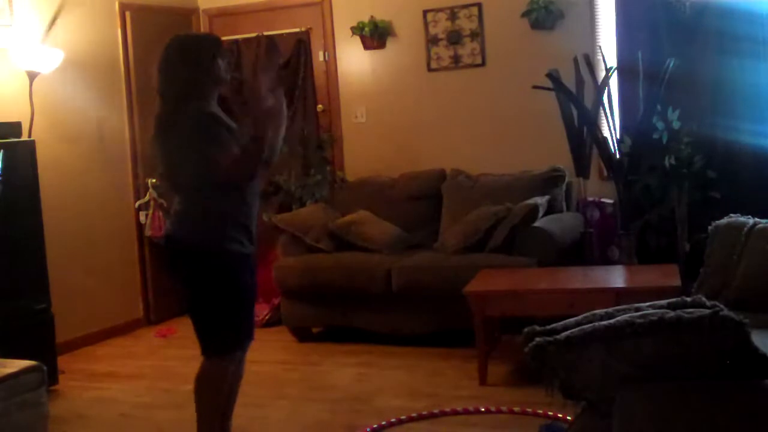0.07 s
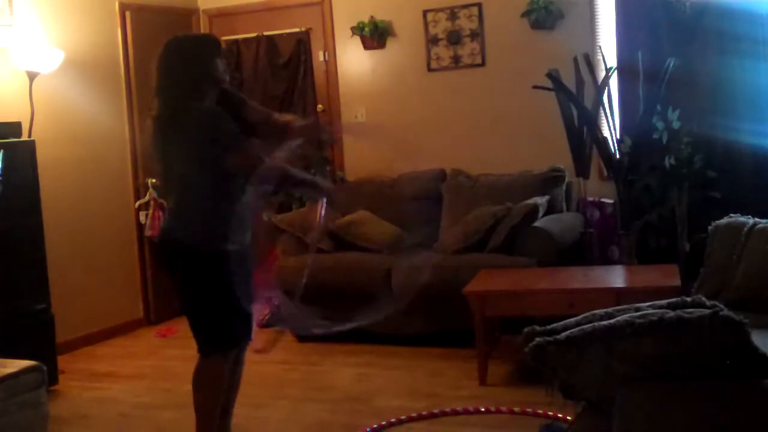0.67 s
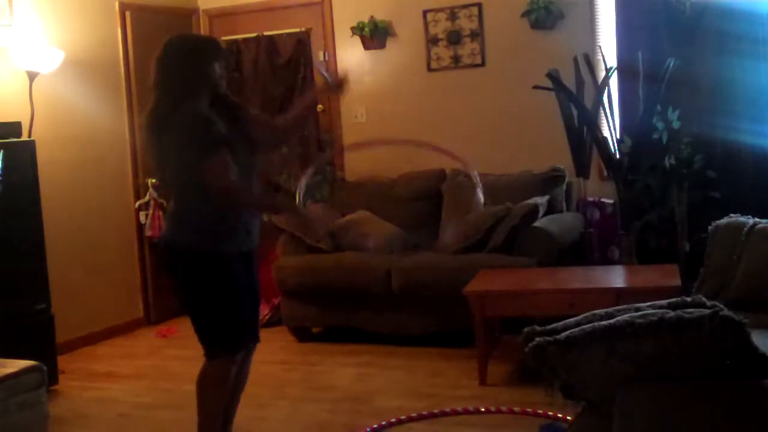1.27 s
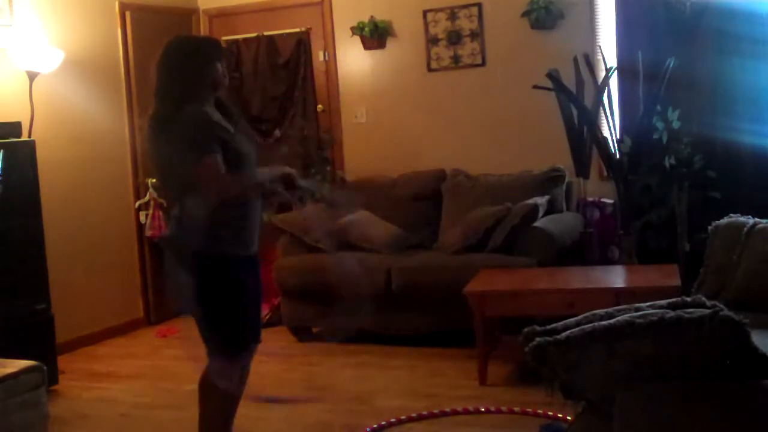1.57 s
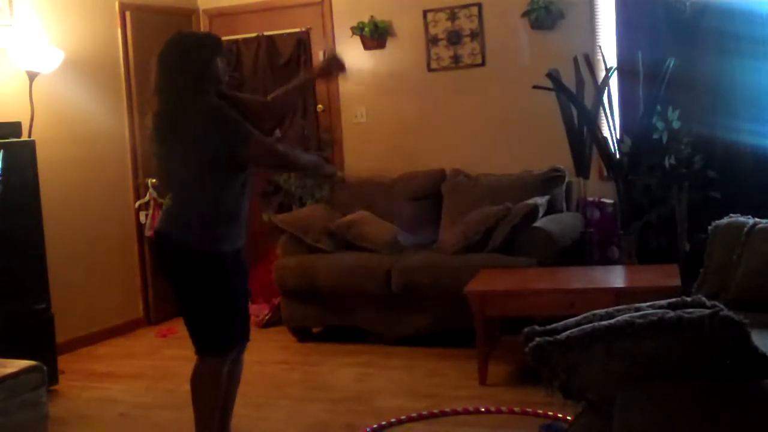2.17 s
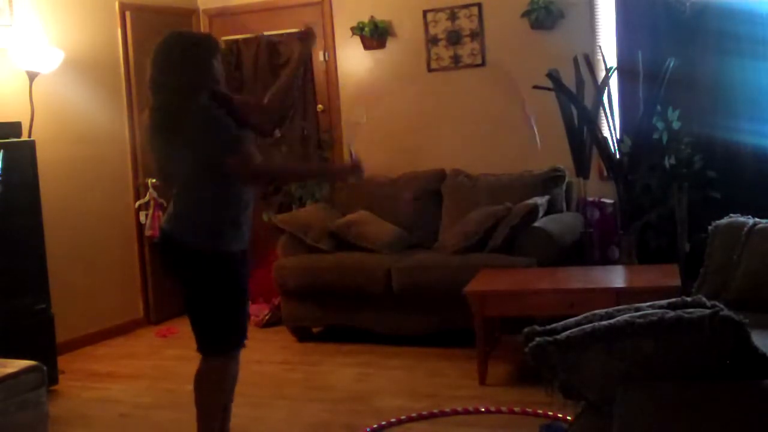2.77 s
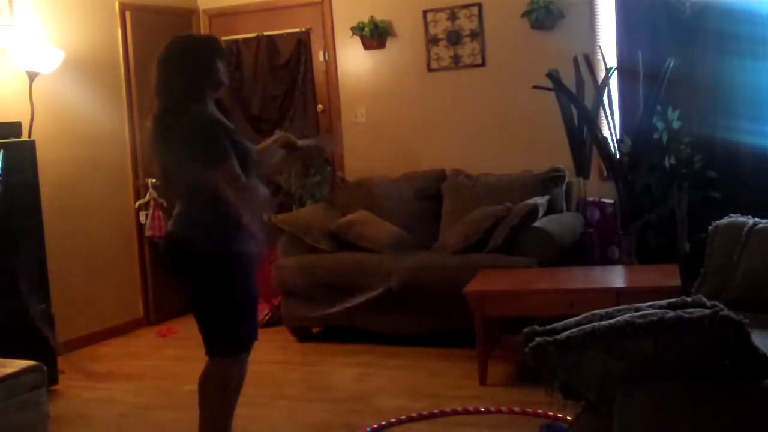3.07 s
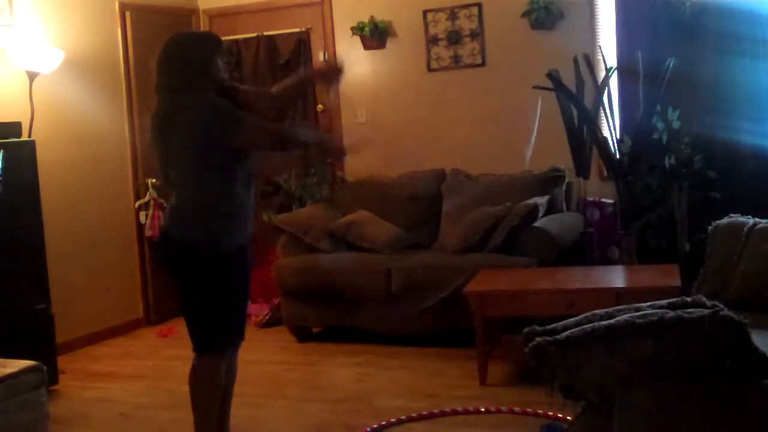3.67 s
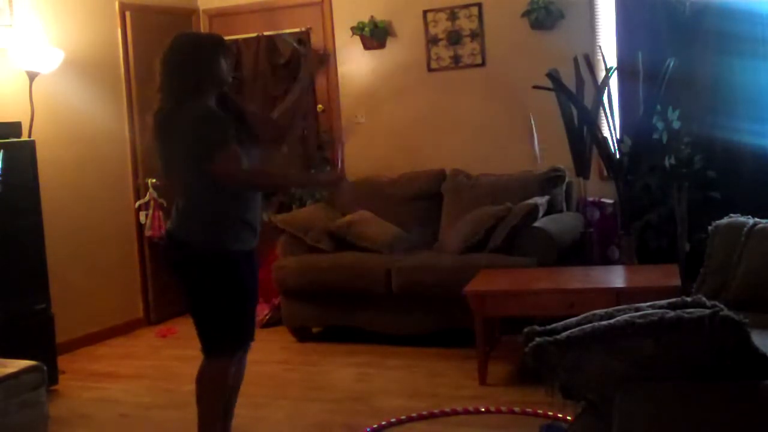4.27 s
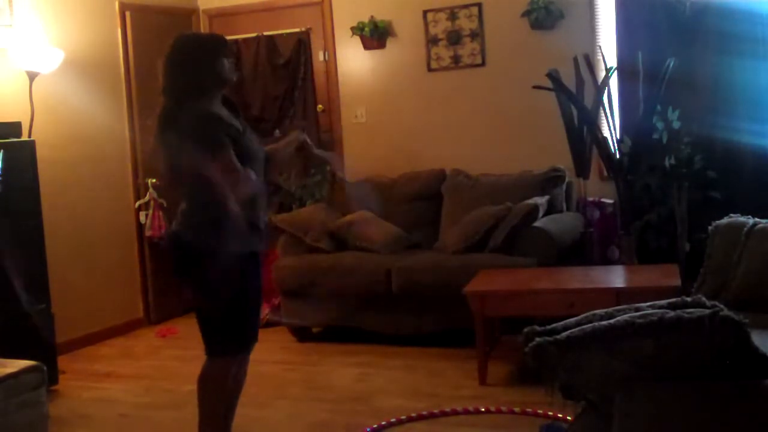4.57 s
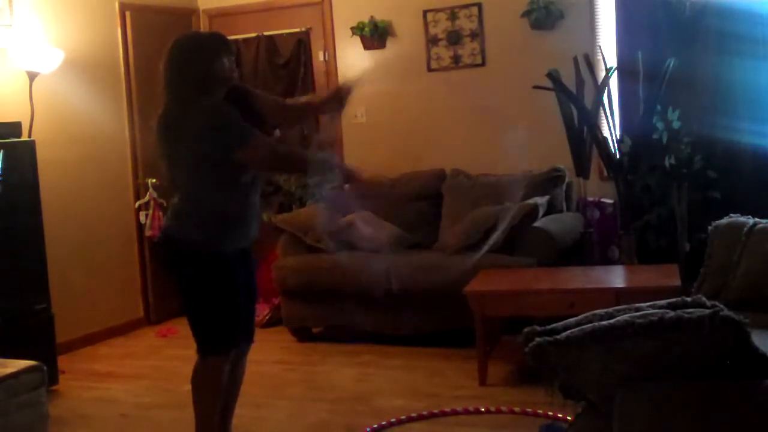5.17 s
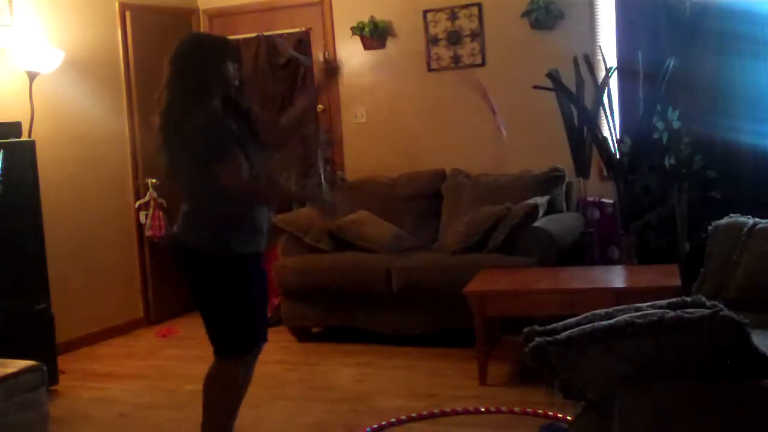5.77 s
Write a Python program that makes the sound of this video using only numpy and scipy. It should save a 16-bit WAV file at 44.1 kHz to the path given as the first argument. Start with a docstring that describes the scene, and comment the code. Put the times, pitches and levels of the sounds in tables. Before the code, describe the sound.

A burst of hard plastic knocks opens the scene as twirling hoops hit each other, the loudest with a slight low thud underneath. After that come only scattered light scrapes and barely audible slides through the palms, until one more bright clack and some softer touches late on. The hoops are heard from a few metres away in a living room, over low hiss and a faint, rising rumble like far traffic.

```python
"""Twirling plastic hoops

Two hoops are twirled by hand in a quiet living room, a few metres away. Now and then they collide:
the tube wall cracks, the hollow tube knocks, and the room rings on. Between the clacks they graze,
slide through the palms and rub faintly. Under the room hiss a far rumble, like traffic, slowly grows."""
import sys
import numpy as np
from scipy import signal
from scipy.fft import rfft, irfft
from scipy.io import wavfile

SR = 44100
rng = np.random.default_rng(int(sys.argv[2]) if len(sys.argv) > 2 else 0)


def master(y):
    """Save y as 16-bit WAV."""
    cut = np.clip(np.atleast_2d(y).T, -1, 1)
    pcm = np.round(cut * 32767)  # scale
    wavfile.write(sys.argv[1], SR, pcm.astype(np.int16))


N = 261072


def from_db(db):
    """Decibels to gain."""
    return 10 ** (np.asarray(db) / 20)


def at_hz(points, hz):
    """Read a curve on a log-frequency axis."""
    points_hz, values = np.transpose(points)
    return np.interp(np.log(np.maximum(hz, 1)), np.log(points_hz), values)


def unit_energy(sound):
    """Scale a short sound to an energy of 1."""
    return sound / np.linalg.norm(sound)


def add(track, start_s, sound):
    """Mix a sound into a track at a time."""
    start = max(round(start_s * SR), 0)
    part = track[..., start:start + sound.shape[-1]]
    part += sound[..., :part.shape[-1]]


def noise(spectrum, size):
    """Noise of the given colour, rms 1."""
    hz = np.arange(size // 2 + 1) * SR / size
    phases = np.exp(2j * np.pi * rng.random(len(hz)))
    coloured = irfft(from_db(at_hz(spectrum, hz)) * phases, size)
    return coloured / coloured.std()


def stereo_noise(spectrum, likeness, size):
    """Diffuse noise: centred where left and right are alike, wide where they are unrelated."""
    hz = np.arange(size // 2 + 1) * SR / size
    alike = np.clip(at_hz(likeness, hz), -.99, .99)
    mid = irfft(rfft(noise(spectrum, size)) * np.sqrt((1 + alike) / 2), size)
    side = irfft(rfft(noise(spectrum, size)) * np.sqrt((1 - alike) / 2), size)
    return np.array([mid + side, mid - side])


def struck(modes):
    """One blow on a set of decaying modes; neighbouring modes swing in opposite senses."""
    t = np.arange(SR // 2) / SR
    hz, level_db, t60_s = np.transpose(sorted(modes))[:, :, None]
    polarity = (-1) ** np.arange(len(modes))[:, None]
    decay = np.exp(-np.log(1000) * t / t60_s)
    return np.sum(polarity * from_db(level_db) * decay * np.sin(2 * np.pi * hz * t), axis=0)


# colours of the hiss and the rumble: freq_hz, level_db
HISS_SPECTRUM = [(20, -99), (50, -99), (80, -96.5), (150, -99.5), (240, -98), (500, -100.5), (1100, -101.5),
                 (2400, -105.5), (4800, -108), (7000, -113.5), (10000, -120.5), (12000, -123.5),
                 (12800, -146), (14000, -165)]
RUMBLE_SPECTRUM = [(20, 11), (45, 1), (85, 5.5), (140, -0.5), (270, -8.5), (500, -4.5), (1000, -7.5),
                   (1600, -12), (2200, -7.5), (3200, -16.5), (6000, -29), (11000, -48), (13000, -80)]
# stereo image of the hiss, and of the rumble and room tail: freq_hz, likeness (0 wide, 1 mono)
HISS_LIKENESS = [(60, 0.4), (200, 0.19), (700, 0.28), (2400, 0.17), (5000, 0.03), (12000, 0.03)]
ROOM_LIKENESS = [(60, 1), (130, 0.93), (350, 0.97), (700, 0.96), (1300, 0.78), (2400, 0.33), (4400, 0),
                 (9000, 0)]
def background(pan_db):
    """The bed: steady hiss, and a far rumble that holds, then draws nearer."""
    nears_at_s, rise_db_per_s = 2.95, 5.5
    rumble_db = -74 + rise_db_per_s * np.maximum(np.arange(N) / SR - nears_at_s, 0)
    rumble = from_db(rumble_db) * stereo_noise(RUMBLE_SPECTRUM, ROOM_LIKENESS, N)
    hiss = from_db(-66) * stereo_noise(HISS_SPECTRUM, HISS_LIKENESS, N)
    return (hiss + rumble) * from_db([[pan_db / 2], [-pan_db / 2]])


def chatter(decay_s, size):
    """Bending waves run round the hoop at different speeds and smear a contact over milliseconds."""
    envelope = np.exp(-np.arange(size) / max(decay_s * SR, 1))
    burst = rfft(rng.standard_normal(size) * envelope)
    flat_burst = irfft(burst / np.abs(burst), size)
    return unit_energy(flat_burst * np.sqrt(envelope))


# what the furnishings send back: freq_hz, level_db
ROOM_COLOUR = [(100, 6.5), (800, 0), (2000, 2.5), (5000, 0.5), (10000, -1.5), (16000, 1)]
# length of the room tail: band_hz, t60_s
ROOM_DECAY = [(60, 0.16), (400, 0.48), (1000, 0.54), (2500, 0.43), (5000, 0.44), (8000, 0.45),
              (14000, 0.31)]
# early reflections off floor and walls: delay_s, level_db
REFLECTIONS = [(.0032, -13.5), (0.012, -17), (0.0291, -13)]
def in_room(sound, chatter_s=0):
    """One position of the hoop: the direct rattle, its reflections, and a tail dying band by band."""
    size, tail_db, build_s, direct_pan_db = 2 ** 15, 2.5, 0.0017, -2
    t = np.arange(size) / SR
    hz = np.arange(size // 2 + 1) * SR / size
    diffuse = rfft(stereo_noise(ROOM_COLOUR, ROOM_LIKENESS, size))
    bands_hz, t60s = np.transpose(ROOM_DECAY)
    response = np.zeros((2, size))
    for share, t60_s in zip(np.eye(len(bands_hz)), t60s):
        band_gain = at_hz(list(zip(bands_hz, share)), hz)
        response += irfft(diffuse * band_gain, size) * np.exp(-np.log(1000) * t / t60_s)
    response *= 1 - np.exp(-t / (build_s + chatter_s))
    response *= from_db(tail_db) / np.linalg.norm(response[0])
    direct = chatter(chatter_s, size)
    for channel, side in enumerate((1, -1)):
        add(response[channel], channel / SR, from_db(side * direct_pan_db / 2) * direct)
        for delay_s, level_db in REFLECTIONS:
            skew_s = rng.integers(0, 8) / SR  # a reflection from the side reaches one channel first
            add(response[channel], delay_s + skew_s, from_db(level_db) * direct)
    return signal.fftconvolve(sound[None], response, axes=1)


# hoop sliding through a palm; faint hollow rubs and a tiny squeak: middle_s, half_length_s, level_db
PALM_SLIDES = [(1.58, 0.053, -73), (1.78, 0.12, -73), (3.785, 0.023, -68.5), (3.98, 0.034, -65),
               (5.40, 0.012, -66)]
HOLLOW_RUBS = [(0.33, 0.021, -67.5), (3.256, 0.024, -67.5), (3.913, 0.002, -59.5), (3.98, 0.013, -65)]
# the bright slide and the hollow rub: freq_hz, level_db
SLIDE_SPECTRUM = [(200, -9), (700, -26), (2000, -2), (4000, 2.5), (6500, -3), (10000, -4.5), (12200, -10),
                  (13500, -43)]
RUB_SPECTRUM = [(200, -30), (550, -3.5), (780, -14), (950, 2.5), (1200, -20), (1550, -3.5), (2100, -18),
                (6000, -48.5)]
def strokes(cues, spectrum):
    """Friction noise that swells and fades with the speed of each stroke."""
    t = np.arange(N) / SR
    speed = sum(from_db(level_db) * np.exp(-((t - middle_s) / half_length_s) ** 2)
                for middle_s, half_length_s, level_db in cues)
    return speed * noise(spectrum, N)


# tones of the low boom: pitch_hz, level_db, t60_s
THUD_MODES = [(40.5, -4, 0.69), (73, -3, .25), (179.5, -4, 0.23), (256, -2.5, .15)]
# where the boom sounds: start_s, level_db
THUDS = [(0.717, -51.5), (0.742, -48), (5.174, -78)]
def thuds():
    """A low boom under some clacks: a few deep tones that start together and die away."""
    out = np.zeros(N)
    for start_s, level_db in THUDS:
        add(out, start_s, from_db(level_db) * struck(THUD_MODES))
    return out


# base colour of the wall's crack: freq_hz, level_db
CRACK_SPECTRUM = [(100, 1), (300, -7.5), (1000, -4), (1900, -5), (3100, -6), (4500, -6), (6000, -5.5),
                  (7500, -6.5), (9000, -9), (11500, -12), (14500, -26.5)]
def crack(centre_hz, low_cut_hz, tilt_db_per_octave):
    """The heavily damped tube wall: the spot hit sets a broad peak, the tilt how bright the crack is."""
    size, peak_db, peak_width_octaves = 2048, 7, 0.31
    hz = np.maximum(np.arange(size // 2 + 1) * SR / size, 1)
    octaves = np.log2(hz / centre_hz)
    colour_db = at_hz(CRACK_SPECTRUM, hz) + tilt_db_per_octave * np.maximum(octaves, -2)
    colour_db += peak_db * np.exp(-(octaves / peak_width_octaves) ** 2)
    # low cut: a glancing touch stirs only the short waves of the wall
    colour_db -= 10 * np.log10(1 + (low_cut_hz / np.maximum(hz, low_cut_hz / 4)) ** 6)
    # minimum phase: nothing sounds before the contact
    cepstrum = irfft(np.log(from_db(colour_db)), size)
    cepstrum[1:size // 2] *= 2
    spectrum = np.exp(rfft(cepstrum[:size // 2], size))
    return unit_energy(irfft(spectrum, size))


# hoop glances off hoop: start_s, level_db, scrape_s, centre_hz, low_cut_hz
GRAZES = [(0.676, -29, 0.02, 4520, 1500), (2.210, -31.5, 0.0097, 3300, 2820),
          (3.762, -39, 0.018, 6460, 2800), (3.950, -27.5, 0.038, 3650, 250), (5.356, -25, 0.02, 2320, 1570),
          (5.478, -35.5, 0.0037, 5600, 4000), (5.806, -46.5, 0.0055, 6000, 3000)]
def grazes():
    """Glancing touches stir only the wall; the longer the scrape, the duller it is."""
    neutral_scrape_s = 0.013
    out = np.zeros((2, N))
    for start_s, level_db, scrape_s, centre_hz, low_cut_hz in GRAZES:
        tilt_db_per_octave = -2 * np.log2(scrape_s / neutral_scrape_s)
        wall = crack(centre_hz, low_cut_hz, tilt_db_per_octave)
        add(out, start_s, from_db(level_db) * in_room(wall, scrape_s))
    return out


# overtones of the hollow tube: pitch_hz, level_db, t60_s
TUBE_MODES = [(769, 5.5, 0.022), (894, -0.5, 0.038), (1013, -3, 0.028), (1346, -9, 0.025)]
def knock(pitch_hz):
    """The hollow tube, struck once: a tight grip lowers its main mode and damps it."""
    main_mode_db, grip_damping_power = 0.5, 4.7
    t60_s = 0.05 * (pitch_hz / 397) ** grip_damping_power
    return unit_energy(struck([(pitch_hz, main_mode_db, t60_s), *TUBE_MODES]))


def contact(crack_db, wall, knock_db, knock_hz):
    """Crack and knock layered; the hoop keeps moving, so each contact excites the room anew."""
    sound = from_db(knock_db) * knock(knock_hz)
    add(sound, 0, from_db(crack_db) * wall)
    hard_hit_db, halving_db = -4.5, 9.5
    chatter_s = 0.0027 * 2 ** ((hard_hit_db - crack_db) / halving_db)  # a harder contact is over sooner
    return in_room(sound, chatter_s)


# hoop hits hoop and rebounds once: start_s, crack_db, centre_hz, tilt_db_per_octave, knock_db, knock_hz,
# rebound_delay_s, rebound_gain_db (over the first crack), rebound_low_cut_hz
CLACKS = [(0.5214, -23, 3500, -0.5, -19, 391, .0122, 2, 800),
          (0.7140, -16, 3950, 4, -17.5, 340, .005, -0.5, 200),
          (0.7364, -4, 4930, 0.5, -15, 493, .0050, 1, 3600),
          (0.8553, -12, 4760, 1.5, -13, 438, .003, 3, 400),
          (5.1753, -10.5, 7160, 1, -18, 406, .003, -0.5, 453)]
def clacks():
    """Each collision is a square hit, then a rebound that rings the wall and hardly knocks."""
    hit_low_cut_hz, rebound_centre_hz, rebound_knock_gain_db = 285, 5250, -9.5
    out = np.zeros((2, N))
    for (start_s, crack_db, centre_hz, tilt_db_per_octave, knock_db, knock_hz,
         rebound_delay_s, rebound_gain_db, rebound_low_cut_hz) in CLACKS:
        hit_wall = crack(centre_hz, hit_low_cut_hz, tilt_db_per_octave)
        rebound_wall = crack(rebound_centre_hz, rebound_low_cut_hz, tilt_db_per_octave)
        add(out, start_s, contact(crack_db, hit_wall, knock_db, knock_hz))
        rebound_knock_db = knock_db + rebound_knock_gain_db
        rebound = contact(crack_db + rebound_gain_db, rebound_wall, rebound_knock_db, knock_hz)
        add(out, start_s + rebound_delay_s, rebound)
    return out


def scene():
    """The hoops in the room, over the bed; the long waves of the thuds reach left and right alike."""
    handling = strokes(PALM_SLIDES, SLIDE_SPECTRUM) + strokes(HOLLOW_RUBS, RUB_SPECTRUM)
    return clacks() + grazes() + thuds() + in_room(handling)[:, :N] + background(pan_db=-1.3)


def record(dry):
    """A steep high cut on the whole mix."""
    cutoff_hz = 14200
    return signal.sosfilt(signal.ellip(10, .1, 80, cutoff_hz, fs=SR, output="sos"), dry)


dry = scene()
out = record(dry)
master(out)
```